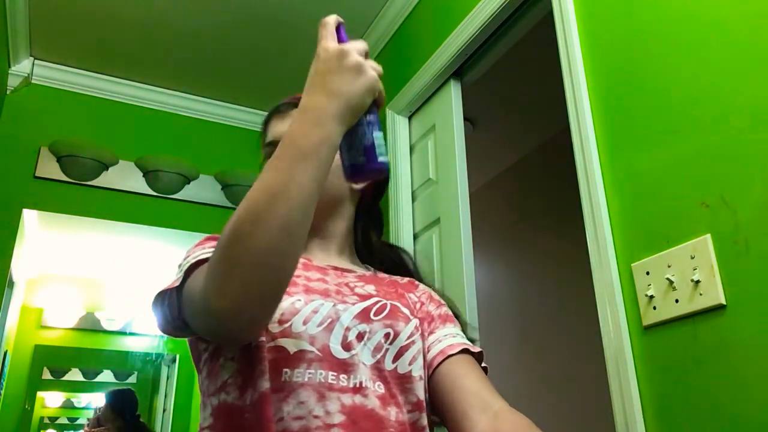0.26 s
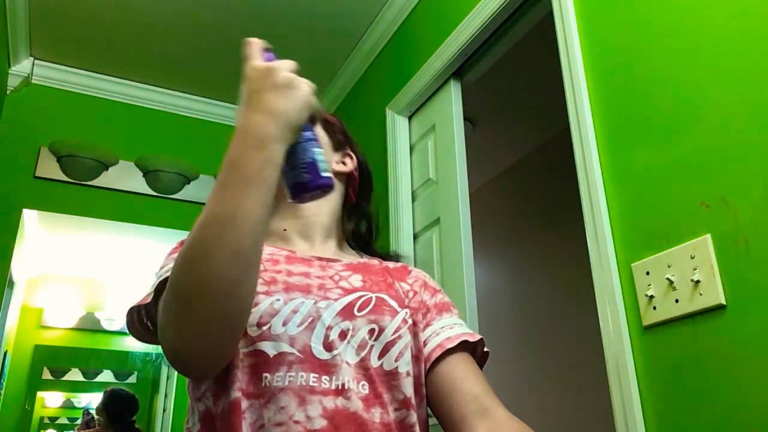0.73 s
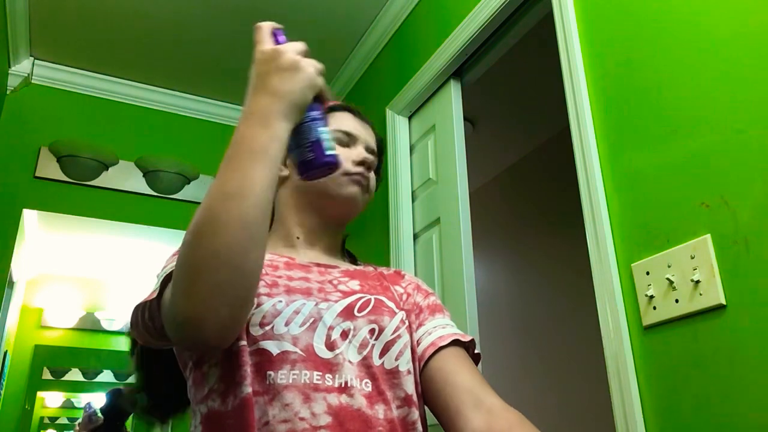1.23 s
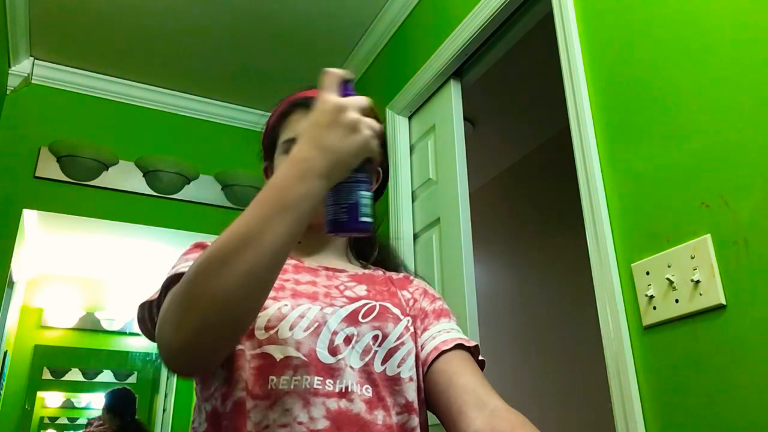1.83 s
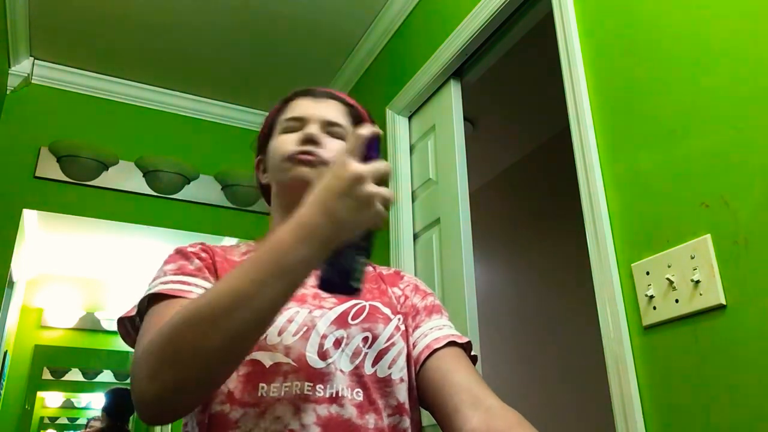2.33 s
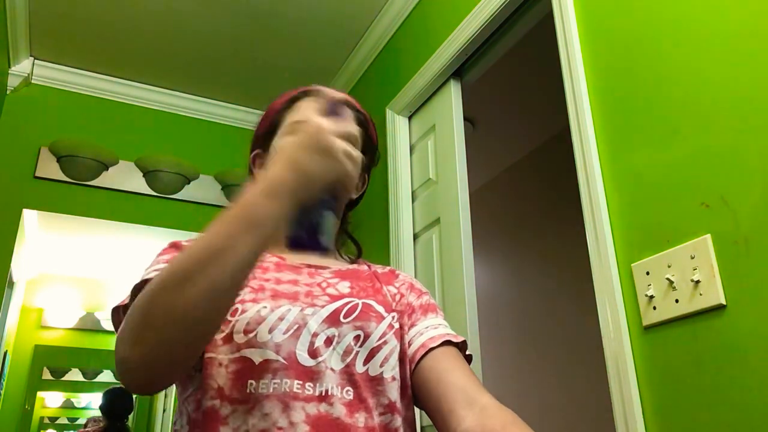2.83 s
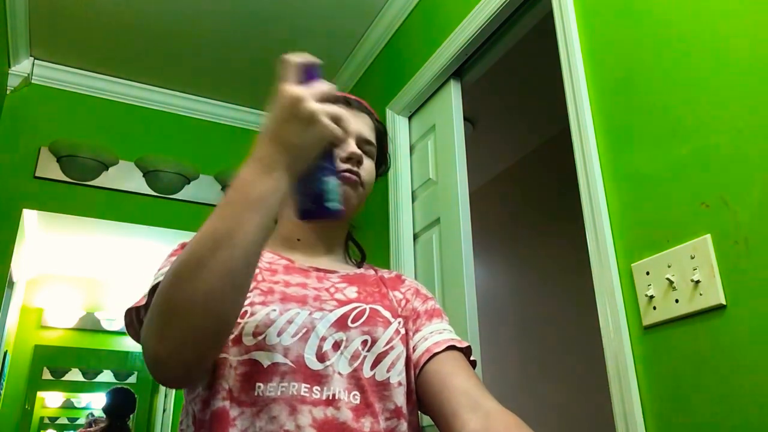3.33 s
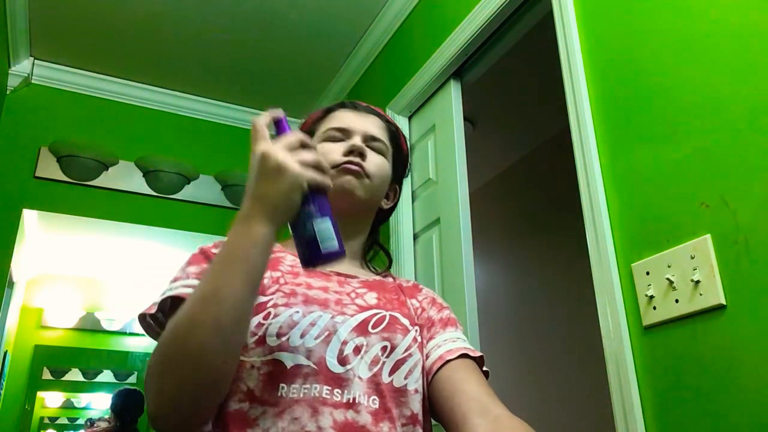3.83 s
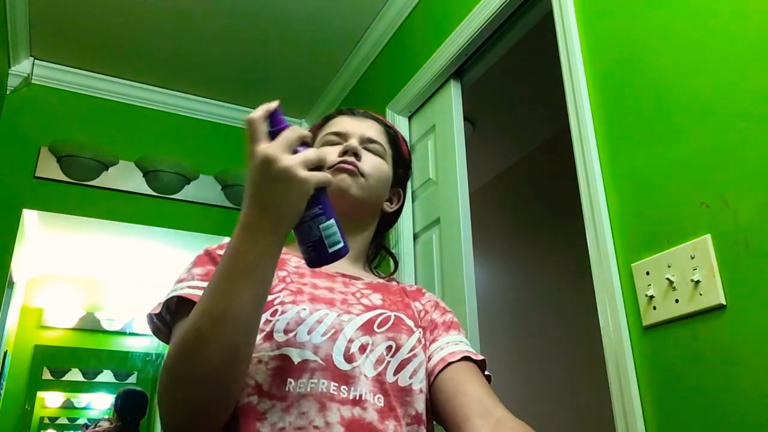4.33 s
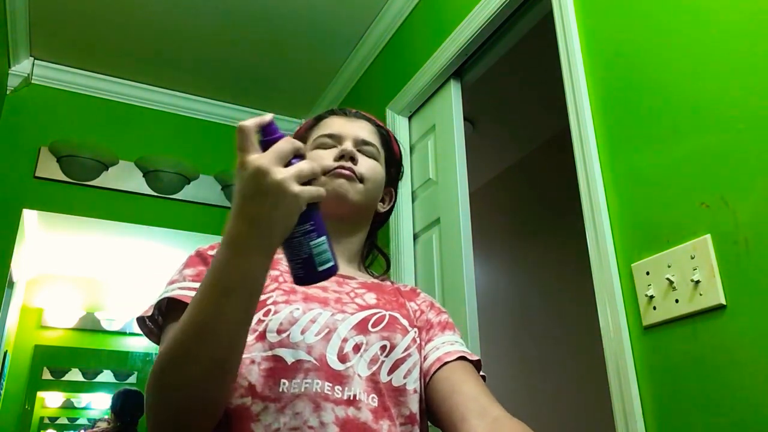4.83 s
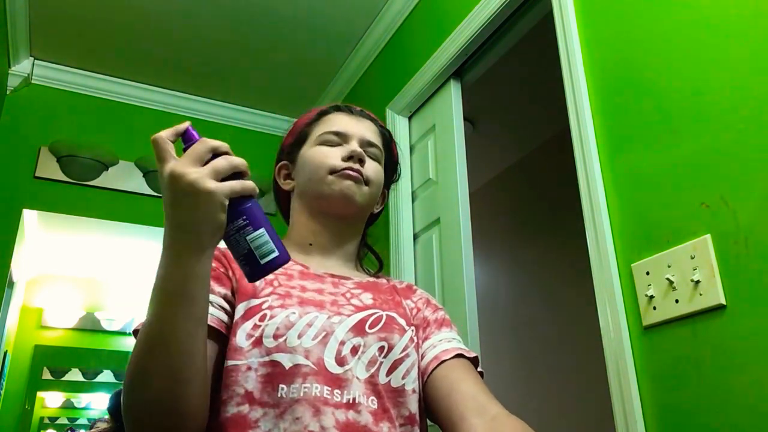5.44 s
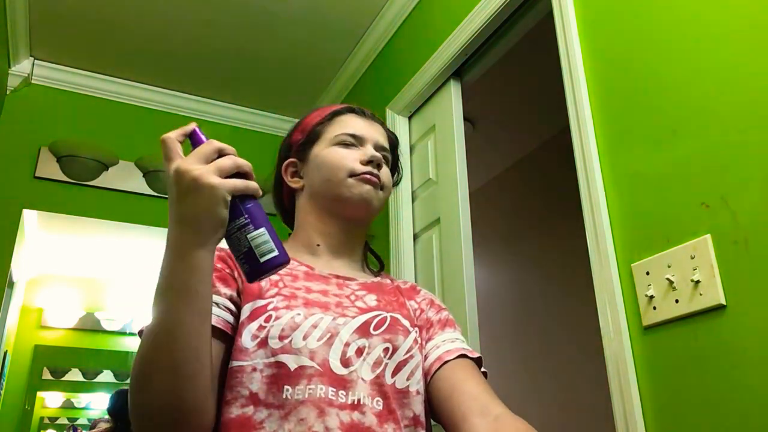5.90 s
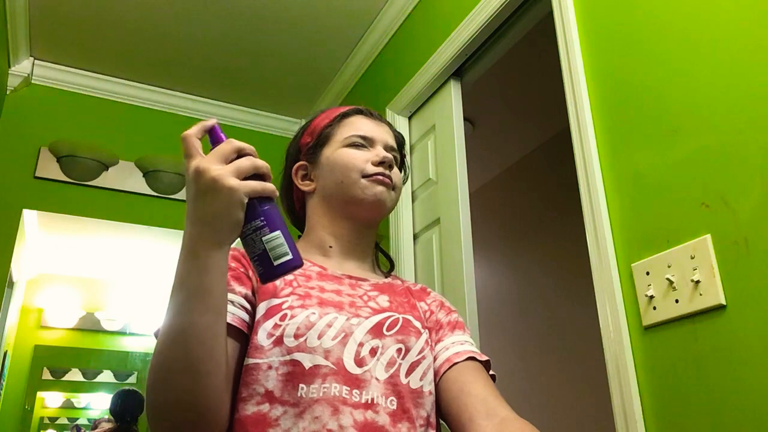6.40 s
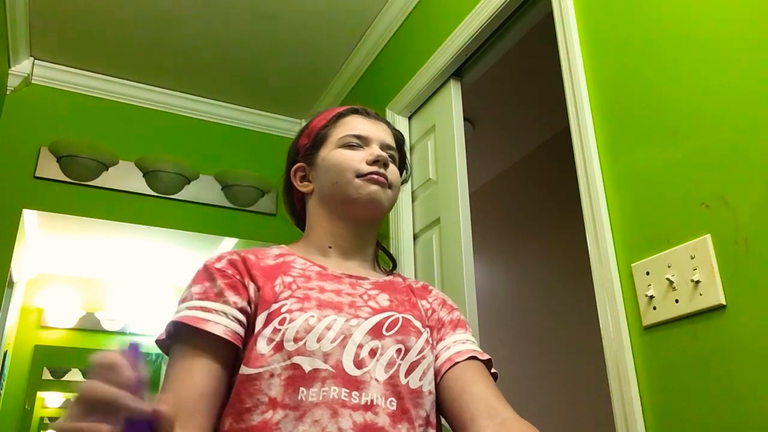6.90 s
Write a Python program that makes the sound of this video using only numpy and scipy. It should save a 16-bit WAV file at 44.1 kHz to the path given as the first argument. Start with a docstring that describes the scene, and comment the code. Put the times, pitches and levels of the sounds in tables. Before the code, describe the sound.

A quiet bathroom with faint air hiss and low hum. A hand pump bottle clicks and squirts about twenty times at a steady quick pace, small dry plastic knocks alternating with breathy bursts of fine spray and occasional thin, high spring ticks. The pumping stops, there is half a second of near silence, then the bottle hits the counter holding the phone: a huge boomy thump with a bright crack and short rattle.

```python
"""A small plastic pump bottle is pressed quickly in a bathroom, an arm's length above a phone on the counter.
Each stroke is filtered noise and decaying modes: a stem scrape, knocks of the hollow bottle, a puff of mist.
Ticks of valve and spring, diffuse echo, air hiss, hum, a swelling drone, a faint rustle and a low bump join in.
At the end the bottle is banged down on the counter, whose dispersive bending waves arrive treble first."""
import sys
import numpy as np
from scipy import signal
from scipy.fft import rfft, irfft
from scipy.io import wavfile
from scipy.ndimage import uniform_filter1d

SR = 44100
rng = np.random.default_rng(int(sys.argv[2]) if len(sys.argv) > 2 else 0)


def put_to_file(sound):
    """Save the sound as 16-bit audio at rate SR, in the file named by the first command-line argument."""
    columns = np.atleast_2d(sound).T  # one column per channel
    safe = np.clip(columns, -1, 1)
    whole_steps = np.round(safe * 32767)
    wavfile.write(sys.argv[1], SR, whole_steps.astype(np.int16))


N = 315756
T = np.arange(N) / SR  # time, s
HZ = np.maximum(np.fft.rfftfreq(N, 1 / SR), 1)  # frequency of each spectral bin


def undb(db):
    """Amplitude ratio of a level: 20 dB per factor of ten."""
    return 10 ** (np.asarray(db) / 20)


def unit(x):
    """Normalization of mean power: rms 1."""
    return x / np.sqrt(np.mean(x ** 2))


def energy_one(x):
    """Normalization of energy: summed squares 1."""
    return x / np.sqrt(np.sum(x ** 2))


def shape(x, spectrum):
    """Linear filtering: gain follows (f/Hz, level/dB) points, joined along log frequency."""
    hz, db = np.transpose(spectrum)
    gain = undb(np.interp(np.log(HZ), np.log(hz), db))
    return irfft(rfft(x, N) * gain, N)


def noise(spectrum):
    """Coloured noise: white noise filtered by a spectrum, rms 1."""
    return unit(shape(rng.standard_normal(N), spectrum))


def band(hz, width_hz):
    """Resonance: white noise under a bell-shaped gain, rms 1."""
    detuning = 2 * (HZ - hz) / width_hz
    return unit(irfft(rfft(rng.standard_normal(N)) / (1 + detuning ** 2), N))


def bands(table):
    """Superposition of noise resonances (f/Hz, width/Hz, level/dB), rms 1."""
    return unit(sum(undb(db) * band(hz, width) for hz, width, db in table))


def patchy(x, db, size):
    """Random modulation: level wanders in patches 3 bins high and size frames long; rms 1."""
    _, _, z = signal.stft(x, SR, nperseg=128)
    patches = uniform_filter1d(rng.standard_normal(z.shape), size=3, axis=0)
    patches = uniform_filter1d(patches, size=size, axis=1)
    modulated = z * undb(db * unit(patches))
    return unit(signal.istft(modulated, SR, nperseg=128)[1][:N])


def ring(modes, length_s, rise_s=1e-5):
    """Modal decay: damped sines (f/Hz, level/dB, t60/s) after a blow that takes rise_s to spread."""
    t = T[:int(length_s * SR)]
    spreading = 1 - np.exp(-(t / rise_s) ** 2)
    return spreading * sum(
        undb(db) * np.sin(2 * np.pi * hz * t) * np.exp(-np.log(1000) * t / t60) for hz, db, t60 in modes)


def add(out, s, x):
    """Superposition: mix x into out from time s."""
    i = int(s * SR)
    out[i:i + len(x)] += x[:N - i]


def air():
    """Stationary broadband noise: room air and microphone hiss."""
    # spectrum of the hiss, density per Hz (f/Hz, level/dB)
    air_spectrum = [(18, -25), (30, -19), (124, -2), (174, -6), (258, -11), (335, -12.5), (680, -18),
                    (1030, -18.5), (1420, -21), (2660, -25.5), (3450, -25.5), (10900, -29), (14600, -36.5),
                    (15800, -36.5)]
    return undb(-64) * noise(air_spectrum)


def hum():
    """Narrow resonances of noise waver beside steady sines of nearly the same pitch."""
    # wavering hum (f/Hz, width/Hz, level/dB)
    wavering = [(60.4, 5.6, -72), (118.1, 3.6, -71.5)]
    # steady hum (f/Hz, level/dB)
    steady = [(59.7, -68), (119.5, -62.5)]
    out = sum(undb(db) * band(hz, width) for hz, width, db in wavering)
    return out + sum(undb(db) * np.sin(2 * np.pi * hz * T) for hz, db in steady)


def drone():
    """Amplitude modulation: low resonances of noise swell now and then."""
    # swelling (t/s, level/dB)
    swell = [(0, -82), (.38, -82), (.53, -64), (.74, -80), (1.05, -70.5), (1.37, -60), (1.56, -65),
             (1.87, -88), (3.22, -68.5), (3.5, -88), (4.3, -70), (4.75, -71.5), (4.9, -61.5), (5.36, -75),
             (6.15, -90), (6.4, -71), (6.85, -78)]
    # resonances (f/Hz, width/Hz, level/dB)
    drone_bands = [(338.4, 66, 1.5), (428, 72, 0), (491, 69, -1.5)]
    return undb(np.interp(T, *np.transpose(swell))) * bands(drone_bands)


def rustle():
    """Random and slow amplitude modulation make a faint mid-range rustle of noise resonances."""
    # rise and fall (t/s, level/dB)
    rustle_level = [(0, -60.5), (.05, -72), (.22, -74), (.3, -70), (.57, -66.5), (.8, -71.5), (2.41, -74),
                    (2.57, -66.5), (2.85, -73.5), (2.91, -66.5), (2.99, -72.5), (3.64, -76.5),
                    (4.25, -70.5), (4.35, -66), (4.83, -70.5), (5.63, -74), (6.46, -71), (6.88, -74.5)]
    # resonances (f/Hz, width/Hz, level/dB)
    rustle_bands = [(1930, 460, -1.5), (2610, 1070, 3.5), (3065, 1100, -7), (3830, 2000, -2.5)]
    return undb(np.interp(T, *np.transpose(rustle_level))) * patchy(bands(rustle_bands), 2.1, size=60)


def stem_scrape(cap_db, cap_hz, t):
    """Friction noise grows until the knock and excites one mode above the cap's pitch."""
    # stem mode (share of cap pitch, level/dB, t60/s)
    stem_mode = (1.078, 0, 0.016)
    # the scrape follows how hard the cap is hit: -47 dB at a usual cap level of -40 dB
    scrape_db = -47 + 0.97 * (cap_db + 40)
    slip = energy_one(rng.standard_normal(len(t)) * t)
    stem = ring([(stem_mode[0] * cap_hz, *stem_mode[1:])], .1, 0.00083)
    return undb(scrape_db) * np.convolve(slip, stem)


def knocks():
    """Impact excitation: a soft push rings the bottle, ragged grit its upper modes and the cap."""
    # knocks of the pump head at both ends of its travel, and clicks of a finger landing on the cap:
    # (t/s, bottle level/dB, bottle f/Hz, cap level/dB, cap f/Hz)
    knock_table = [(0.074, -46.5, 338, -35.5, 2380), (.166, -50, 354, -47, 2500),
                   (.37, -45, 354, -42.5, 2460), (.577, -52, 378, -46.5, 2940),
                   (.655, -48, 364, -40.5, 2400), (.953, -45.5, 340, -35, 2380),
                   (1.049, -55, 363, -55, 2450), (1.157, -56, 422, -48.5, 2480),
                   (1.23, -44.5, 366, -40, 2400), (1.408, -51, 338, -43, 2370),
                   (1.492, -46.5, 371, -41, 2340), (1.586, -52, 362, -46, 2380),
                   (1.774, -48, 355, -42, 2330), (1.879, -53, 372, -55, 2590),
                   (2.08, -45, 358, -40.5, 2340), (2.167, -45.5, 348, -45, 2290),
                   (2.369, -47, 342, -40, 2315), (2.462, -51, 350, -52, 2700),
                   (2.66, -44, 360, -41.5, 2390), (2.762, -49.5, 349, -48, 2020),
                   (3.002, -44.5, 346, -41.5, 2300), (3.105, -61, 347, -66, 1800),
                   (3.309, -48, 358, -42.5, 2330), (3.412, -49.5, 360, -56, 1750),
                   (3.633, -47.5, 352, -44, 2500), (3.811, -64, 312, -38.5, 2160),
                   (3.893, -44, 348, -41, 2370), (4.177, -40.5, 388, -36.5, 2470),
                   (4.259, -48, 382, -42, 2390), (4.346, -53.5, 303, -46, 1700),
                   (4.451, -40.5, 369, -42.5, 1750), (4.538, -51.5, 400, -55, 2320),
                   (4.615, -57, 450, -44, 1710), (4.713, -42, 358, -41, 2450),
                   (4.795, -43.5, 330, -40, 2360), (4.91, -59, 384, -49, 1940),
                   (5.004, -44.5, 350, -38, 2370), (5.183, -53, 318, -37.5, 1910),
                   (5.298, -40.5, 395, -36.5, 2410), (5.39, -50.5, 350, -42.5, 2180),
                   (5.592, -40, 350, -35.5, 2160), (5.697, -51.5, 396, -52.5, 2080),
                   (5.891, -44, 365, -40, 2280), (5.994, -54, 396, -49, 2260),
                   (6.093, -69, 310, -52.5, 2430), (6.201, -43.5, 349, -34, 2280),
                   (6.301, -45.5, 353, -42, 2360)]
    # upper bottle modes (f/Hz, relative level/dB, t60/s)
    bottle_modes = [(608, 7.5, 0.033), (800, 10.5, 0.011), (1017, 9, 0.021), (1386, 7.5, .012),
                    (1730, 1, 0.011)]
    # cap modes (share of cap pitch, relative level/dB, t60/s)
    cap_modes = [(.62, 0.5, 0.0046), (.76, -4.5, 0.012), (0.881, -1.5, 0.013), (0.999, 1.5, 0.013),
                 (1.13, 0, 0.0077), (1.3, -13, 0.0052)]
    bottle_t60_s, bottle_rise_s = 0.059, 0.0017
    rattle_s, landing_s = 0.006, 0.00012  # decay of the grit and of the push
    crunch_db = 2.5  # bare grit against the cap level
    out = np.zeros(N)
    t = T[:SR // 30]
    push = t * np.exp(-t / landing_s)  # a soft landing
    push = push / push.sum()
    crunch_filter = signal.butter(N=2, Wn=(500, 3200), btype="band", fs=SR, output="sos")
    crunch = energy_one(signal.sosfilt(crunch_filter, signal.unit_impulse(len(t))))
    for s, db, hz, cap_db, cap_hz in knock_table:
        grit = rng.standard_normal(len(t))
        blow = energy_one(np.sqrt(t) * np.exp(-t / rattle_s) * grit)
        # upper modes grow less than the low mode: -59 dB at a usual knock of -47 dB
        upper_db = -59 + 0.86 * (db + 47)
        detune = 1 + 0.022 * rng.standard_normal(len(bottle_modes))
        upper_modes = [(f * k, d + upper_db, t60) for (f, d, t60), k in zip(bottle_modes, detune)]
        upper = ring(upper_modes, .1, 0.00031)
        cap = ring([(share * cap_hz, d + cap_db, t60) for share, d, t60 in cap_modes], .1, 0.00057)
        bottle = ring([(hz, db, bottle_t60_s)], .1, bottle_rise_s)
        add(out, s - len(t) / SR, stem_scrape(cap_db, cap_hz, t))
        add(out, s, np.convolve(push, bottle))
        add(out, s, np.convolve(blow, upper + cap))
        add(out, s, undb(cap_db + crunch_db) * np.convolve(blow, crunch))
    return out


def tail():
    """Diffuse reverberation of the hard walls: noise of energy 1 that dies faster in the treble."""
    # reverberation time (f/Hz, t60/s)
    room_t60 = [(250, .38), (1000, .38), (3000, .32), (8000, .29), (14000, .24)]
    size = SR // 2
    f, _, z = signal.stft(rng.standard_normal(size), SR, nperseg=256)
    hz, t60 = np.transpose(room_t60)
    t = np.arange(z.shape[1]) * 128 / SR
    decay = undb(-60 * t / np.interp(f, hz, t60)[:, None])
    echo = signal.istft(z * decay, SR, nperseg=256)[1][:size]
    return energy_one(echo * np.clip(T[:size] / 0.0079, 0, 1))  # first walls are a few ms away


def room(x):
    """Reverberation as convolution: the echo of x."""
    return signal.fftconvolve(x, tail())[:N]


def puffs():
    """Turbulent jet noise swells as pressure builds, holds, then dies with the stroke; it spits in patches."""
    # puffs of mist (t/s, level/dB, time until the fall/s)
    puff_table = [(.095, -50.5, 0.026), (.388, -50.5, 0.026), (.6836, -52, 0.02), (0.973, -51.5, 0.032),
                  (1.253, -51, .025), (1.512, -52, 0.027), (1.8023, -52.5, 0.023), (2.097, -50.5, 0.028),
                  (2.3908, -51.5, 0.025), (2.686, -53, 0.026), (3.026, -52, 0.02), (3.335, -52.5, 0.021),
                  (3.655, -52.5, 0.021), (3.911, -52.5, .028), (4.189, -52, 0.027), (4.463, -50.5, 0.033),
                  (4.726, -50.5, 0.035), (5.025, -50.5, 0.025), (5.314, -50.5, .028), (5.62, -59, 0.023),
                  (5.9157, -51, 0.023), (6.2247, -49.5, 0.019)]
    # spectrum of the mist, density per Hz (f/Hz, level/dB)
    mist_spectrum = [(410, -27), (700, -7), (1330, -9.5), (3140, -3), (5710, -4.5), (6510, -1.5),
                     (7710, -4), (10300, -3), (13500, -2.5), (15800, -13.5)]
    rise_s, fall_s = 0.0069, 0.013
    drops_db, drops_scatter_db = -14, 5.5  # coarse drops under the jet, different at each puff
    flow, coarse = np.zeros((2, N))
    t = T[:SR // 5]
    for s, db, length in puff_table:
        swell = 1 - np.exp(-(t / rise_s) ** 2)
        jet = undb(db) * swell * np.exp(-np.maximum(t - length, 0) / fall_s)
        add(flow, s, jet)
        add(coarse, s, undb(drops_db + drops_scatter_db * rng.standard_normal()) * jet)
    mist = flow * patchy(noise(mist_spectrum), 2.3, size=8)
    # coarser drops add a hiss of their own lower down
    drops = coarse * patchy(band(2920, 2500), 1.7, size=8)
    return mist + drops


def ticks():
    """Gritty impulses excite a few modes, damped faster than the grit dies; high ticks are short."""
    # thin ticks of the valve and spring (t/s, level/dB, f/Hz)
    tick_table = [(.2498, -46, 12500), (1.1273, -52, 12600), (1.839, -53.5, 1860), (2.28, -54, 12000),
                  (2.9248, -52, 9500), (3.504, -48, 1840), (4.158, -50, 9000), (4.176, -41, 10800),
                  (4.358, -53, 12900), (4.448, -45, 10500), (4.71, -44.5, 10200), (4.81, -33, 6850),
                  (4.91, -56, 13000), (5.2972, -45, 10000), (5.5972, -48, 9400), (6.239, -48, 7250)]
    # modes of a tick (share of its pitch, relative level/dB)
    tick_modes = [(.7, -12), (1.0, 1.5), (1.25, -13), (1.6, -12)]
    out = np.zeros(N)
    t = T[:SR // 20]
    for s, db, hz in tick_table:
        t60 = 150 / hz  # the grit is 60 dB down after 150 cycles
        grit = energy_one(rng.standard_normal(len(t)) * undb(-60 * t / t60))
        modes = [(share * hz, db + d, 0.14 * t60) for share, d in tick_modes]
        add(out, s, np.convolve(grit, ring(modes, .05)))
    return out


def bump():
    """Modal decay of a single low mode with a slow onset: a soft low bump."""
    # (t/s, f/Hz, level/dB, t60/s, rise time/s); squared in the onset, so the sign has no effect
    low_bump = (2.885, 150, -49, .12, -4.2)
    out = np.zeros(N)
    add(out, low_bump[0], ring([low_bump[1:4]], .2, low_bump[4]))
    return out


def counter_waves(bang_s):
    """Dispersion: bending waves run faster the higher they are, so the bass of the blow arrives late."""
    # spectrum of the first wave (f/Hz, relative level/dB)
    thud_spectrum = [(40, -45), (65, -18), (120, -6), (200, 2), (310, -20.5), (440, -2.5), (540, -12.5),
                     (640, -10), (800, -33), (1500, -34.5), (3000, -53)]
    # counter modes (f/Hz, level/dB, t60/s)
    counter_modes = [(77.1, -8.5, 0.42), (118.4, -7, 0.35), (130, -3, 0.46), (169.6, -12.5, 0.42),
                     (196.6, -20.5, 0.43), (223, -20, 0.32), (274.4, -25, 0.44), (363, -26, 0.48),
                     (403, -27, 0.44), (446, -21.5, 0.44), (467, -25, 0.31), (508, -22.5, 0.33),
                     (601, -24, 0.25), (680, -28.5, 0.36)]
    bend_s, bend_slope = 0.01785, 0.81  # lag law scaled at 100 Hz, and its fall with frequency
    first = energy_one(shape(np.ones(1), thud_spectrum)) * undb(19)
    push = np.hanning(int(0.0014 * SR))
    modes = np.zeros(N)
    add(modes, 0, np.convolve(push / push.sum(), ring(counter_modes, .8, 0.0054)))
    # group delay, constant below 125 Hz, summed over frequency into phase
    lag_s = bang_s + bend_s * (100 / np.maximum(HZ, 125)) ** bend_slope
    travel = np.exp(-2j * np.pi * np.cumsum(lag_s) * SR / N)
    first, modes = (irfft(rfft(x) * travel, N) * (T > bang_s) for x in (first, modes))
    return first + modes + undb(-8) * room(first)


def crack(bang_s):
    """Contact noise of the plastic comes through the air, repeats as the bottle settles and fills the room."""
    # spectrum of the crack, density per Hz (f/Hz, level/dB)
    crack_spectrum = [(600, -35), (1000, -5), (2150, -3), (4800, -13), (7400, -8), (9250, 5), (10500, -5.5),
                      (12000, -3), (15800, -36)]
    # spectrum of its echo, density per Hz (f/Hz, level/dB)
    echo_spectrum = [(470, -38), (800, -7.5), (989, -3.5), (1210, -12), (1590, -27), (1970, -3),
                     (2120, -9.5), (2720, -6), (3490, -11.5), (5470, -11), (6040, -10.5), (7570, -12),
                     (10100, -19), (11600, -12.5), (15800, -34)]
    # the bottle settles (t/s, level under the crack/dB)
    bounces = [(6.916, -8), (6.942, -18), (7.023, -33), (7.142, -47)]
    crack_db, crack_s = -19.5, .0015  # peak level of the contact and time to reach it
    contact = 0
    for s, db in [(bang_s, 0)] + bounces:
        t = np.maximum(T - s, 0) / crack_s
        contact = contact + undb(crack_db + db) * t * np.exp(1 - t)
    echo = energy_one(patchy(shape(tail(), echo_spectrum), 2.5, size=20))
    echo = np.roll(echo, int(bang_s * SR)) * (T > bang_s)
    return contact * noise(crack_spectrum) + undb(2) * echo


def bang():
    """Structure-borne and airborne paths of one impact: counter waves and plastic crack."""
    bang_s = 6.9055
    return counter_waves(bang_s) + crack(bang_s)


def scene():
    """Superposition of the pump with its echo, the bang and the background."""
    background = air() + hum() + drone() + rustle() + bump()
    pump = knocks() + puffs() + ticks()
    pump_room_db = -7.5
    return (background + pump + undb(pump_room_db) * room(pump) + bang())[None]


def record(dry):
    """Band limiting: the phone drops the deep bass and cuts the top."""
    bass_cut = signal.butter(N=4, Wn=52, btype="high", fs=SR, output="sos")
    top_cut = signal.ellip(10, .2, 70, 15830, fs=SR, output="sos")  # ripple 0.2 dB, stopband 70 dB down
    return signal.sosfilt(top_cut, signal.sosfilt(bass_cut, dry))


dry = scene()
out = record(dry)
put_to_file(out)
```